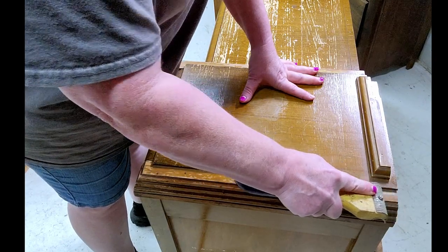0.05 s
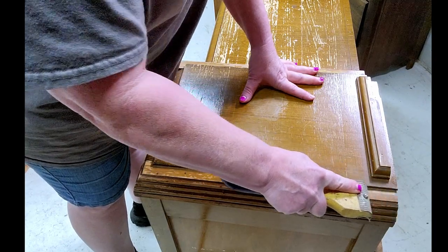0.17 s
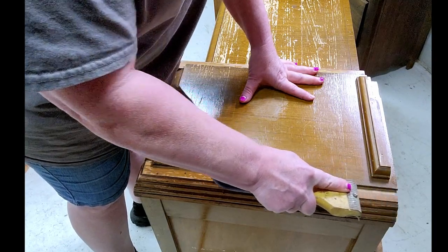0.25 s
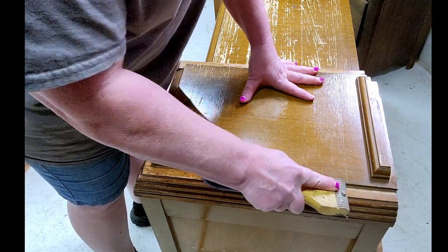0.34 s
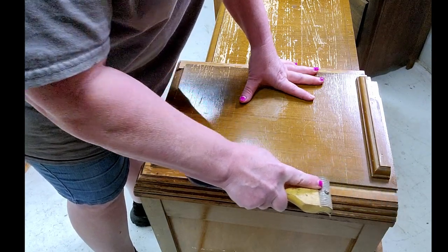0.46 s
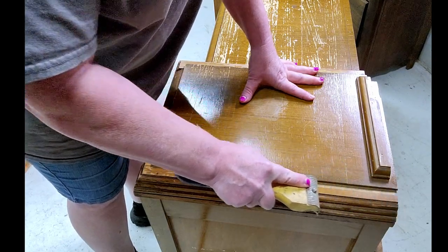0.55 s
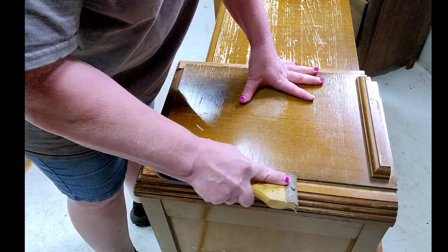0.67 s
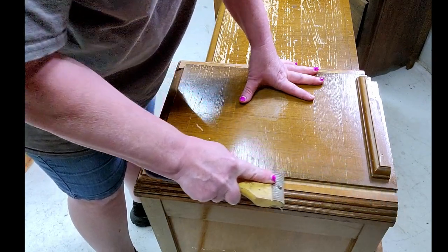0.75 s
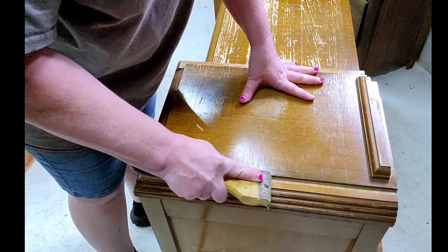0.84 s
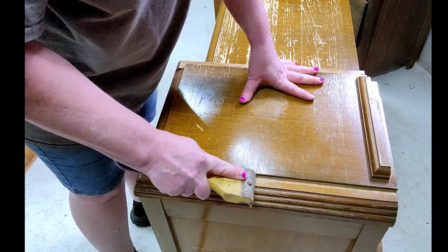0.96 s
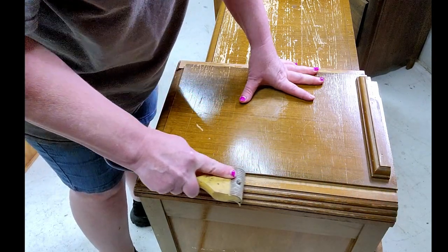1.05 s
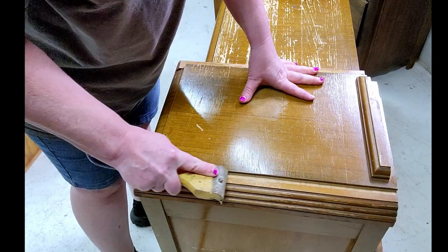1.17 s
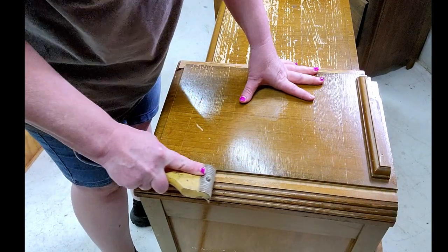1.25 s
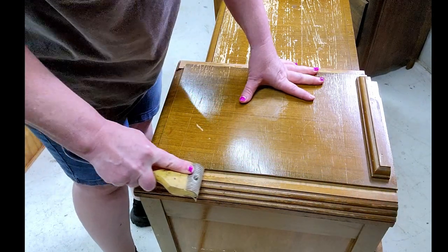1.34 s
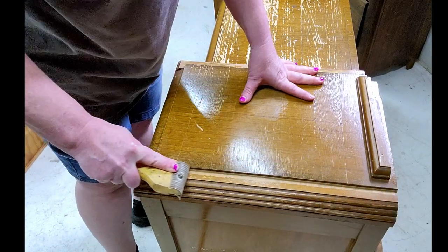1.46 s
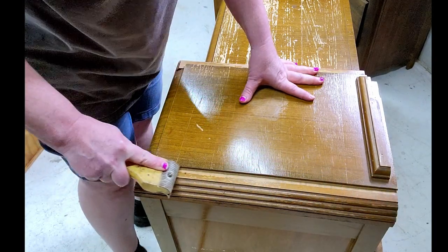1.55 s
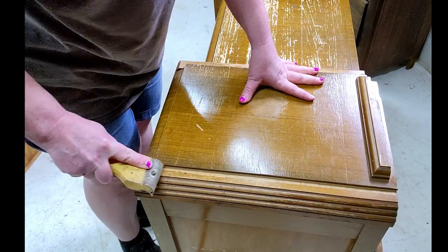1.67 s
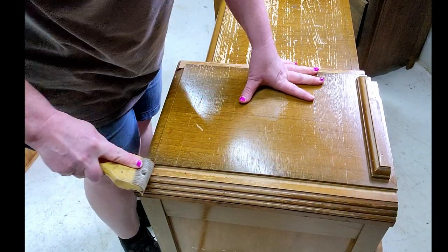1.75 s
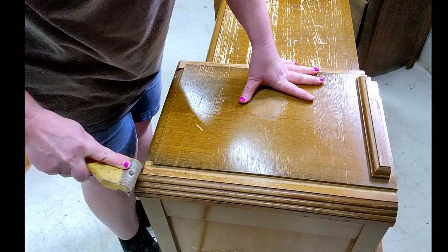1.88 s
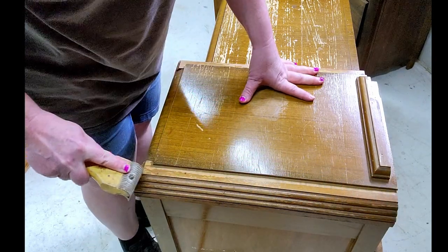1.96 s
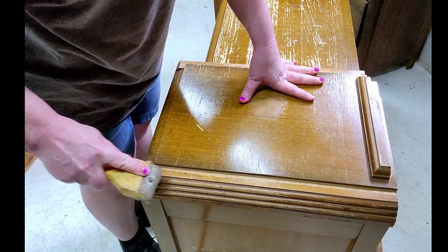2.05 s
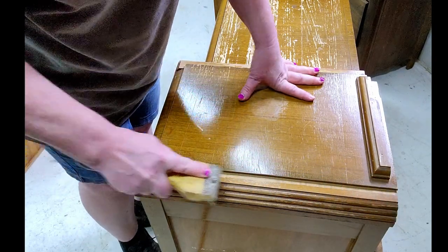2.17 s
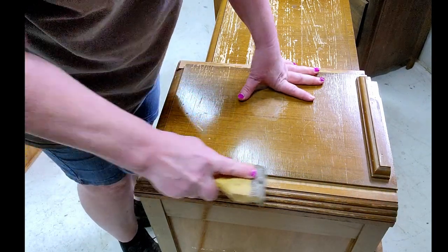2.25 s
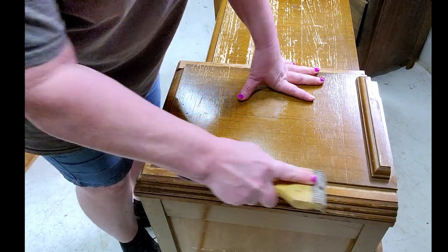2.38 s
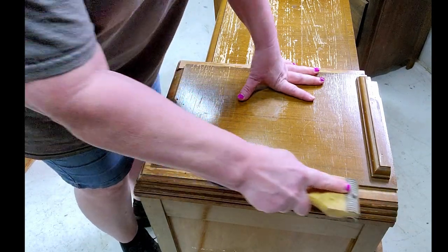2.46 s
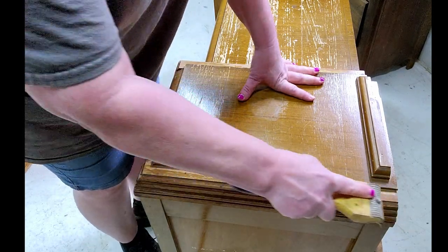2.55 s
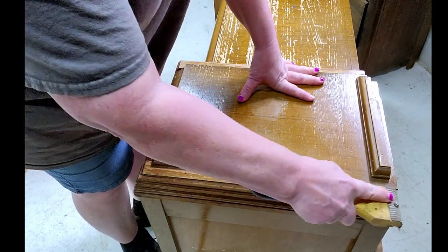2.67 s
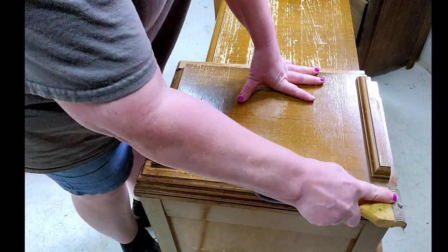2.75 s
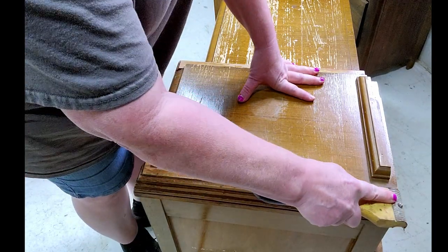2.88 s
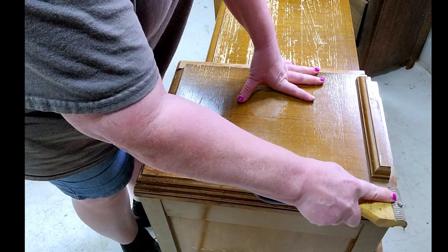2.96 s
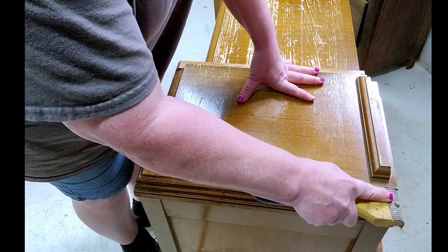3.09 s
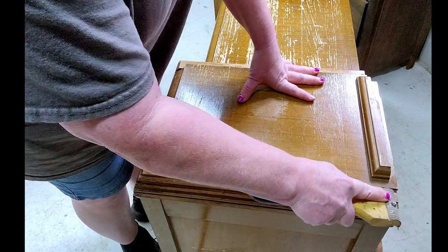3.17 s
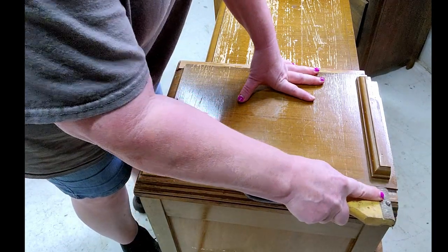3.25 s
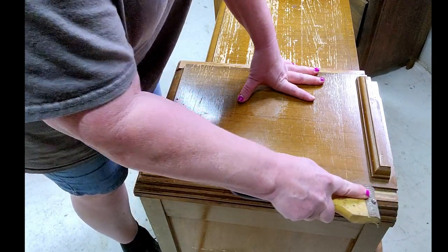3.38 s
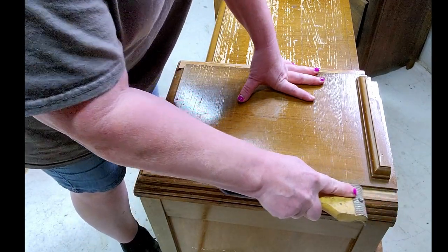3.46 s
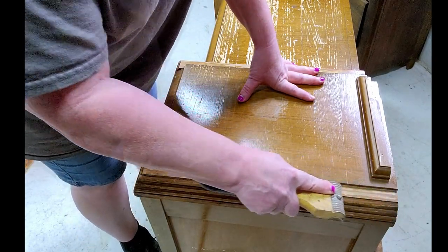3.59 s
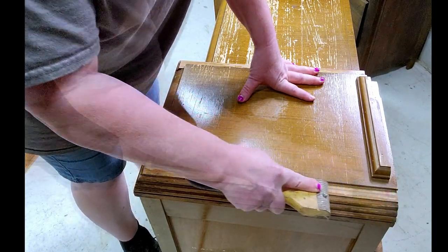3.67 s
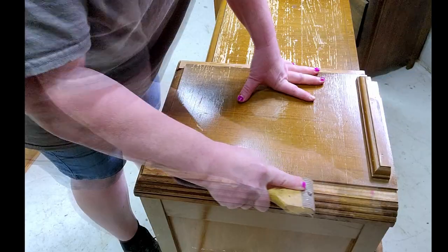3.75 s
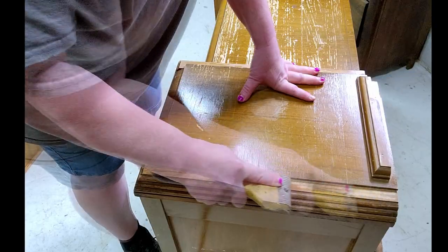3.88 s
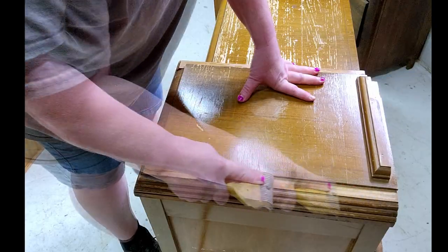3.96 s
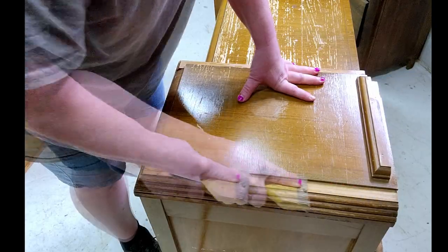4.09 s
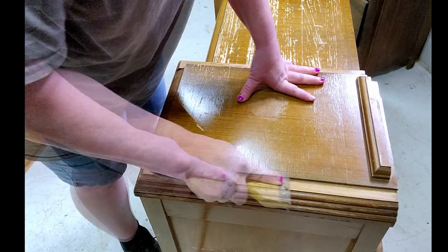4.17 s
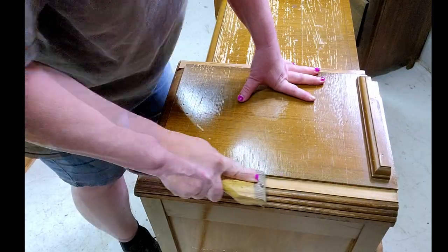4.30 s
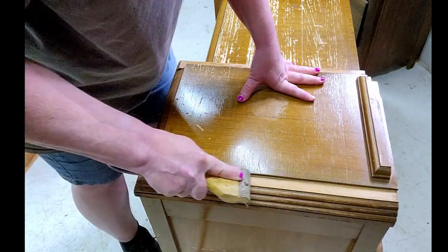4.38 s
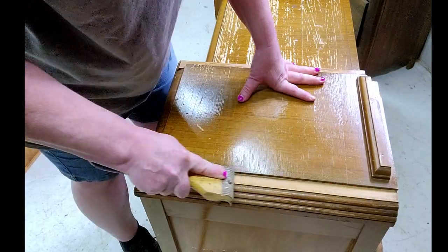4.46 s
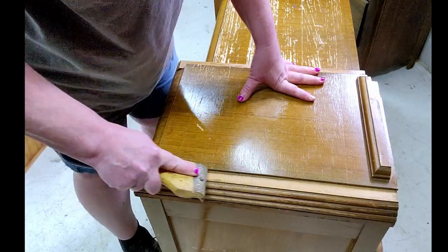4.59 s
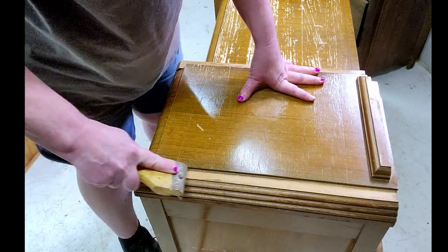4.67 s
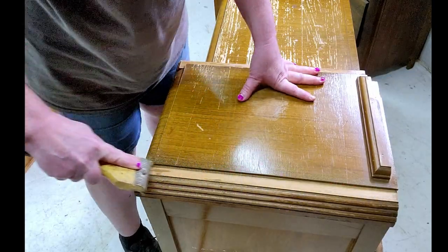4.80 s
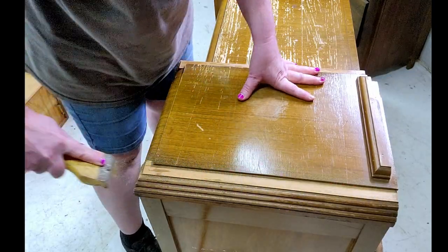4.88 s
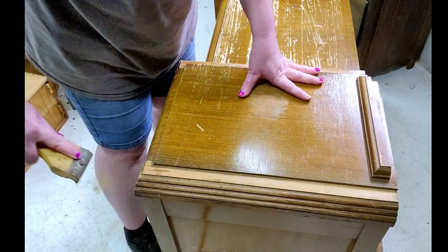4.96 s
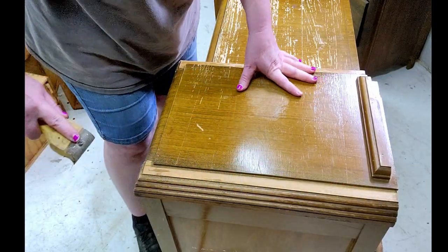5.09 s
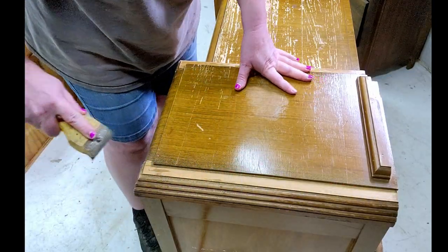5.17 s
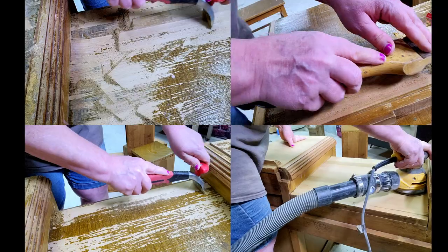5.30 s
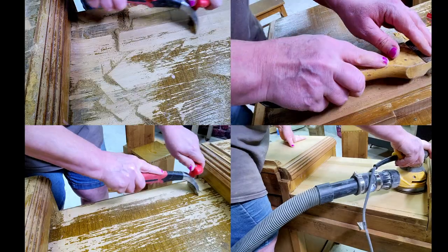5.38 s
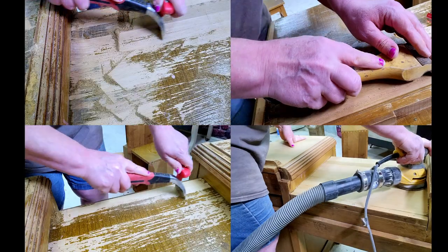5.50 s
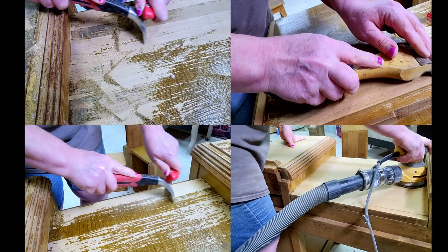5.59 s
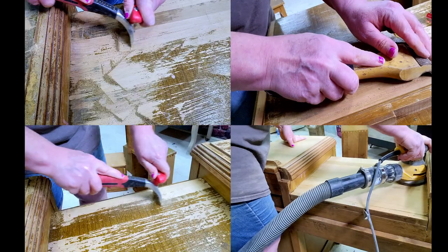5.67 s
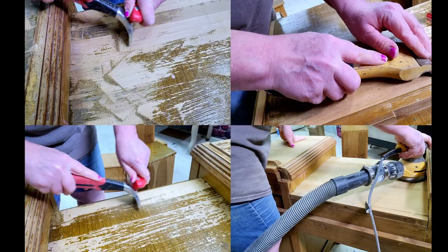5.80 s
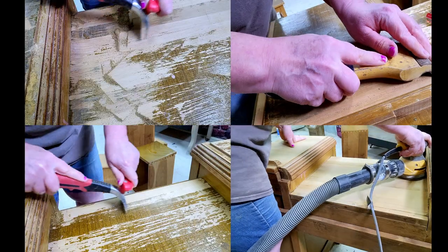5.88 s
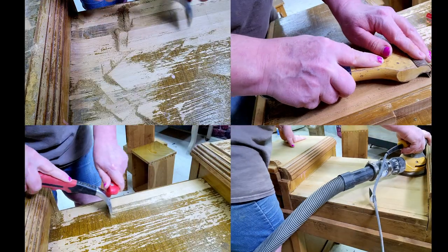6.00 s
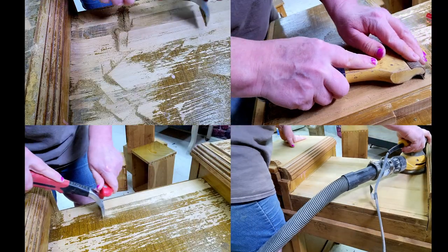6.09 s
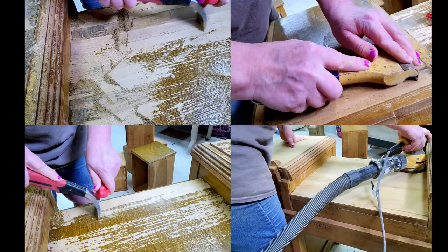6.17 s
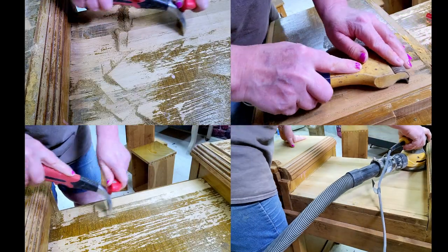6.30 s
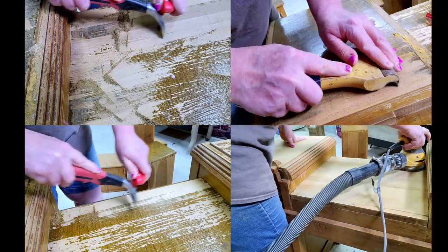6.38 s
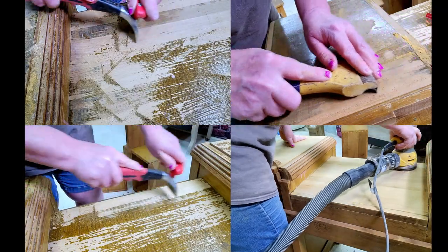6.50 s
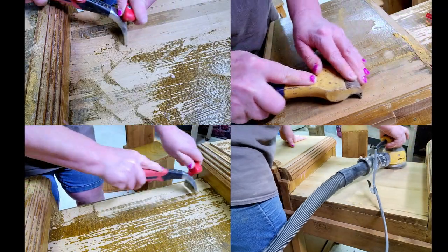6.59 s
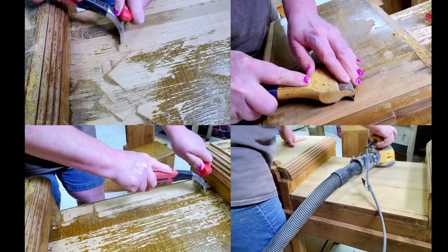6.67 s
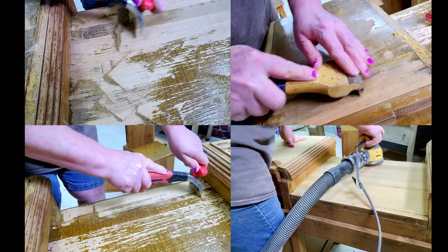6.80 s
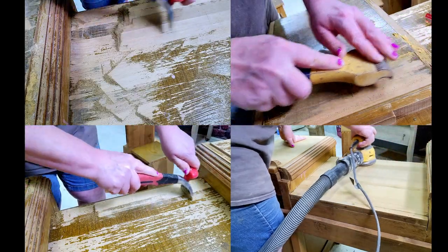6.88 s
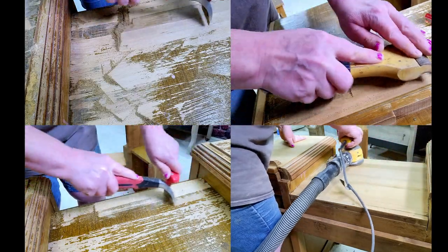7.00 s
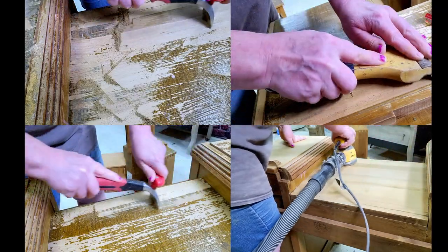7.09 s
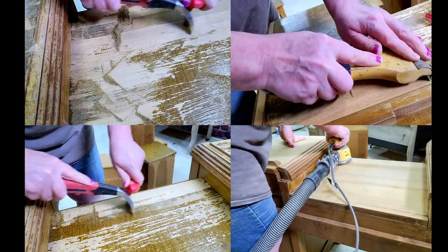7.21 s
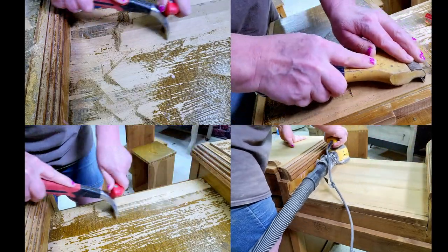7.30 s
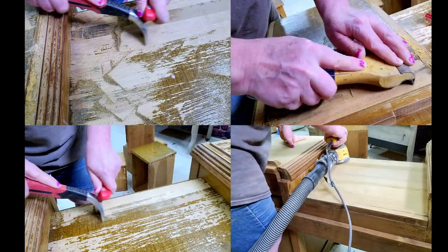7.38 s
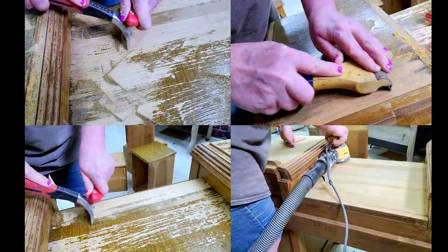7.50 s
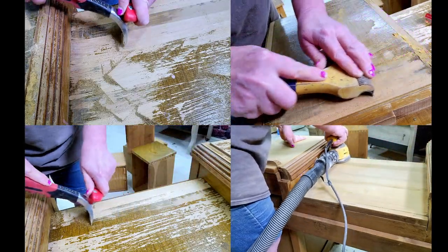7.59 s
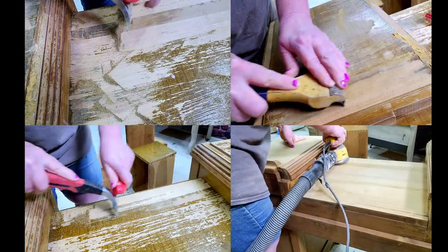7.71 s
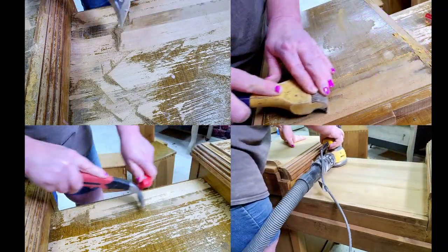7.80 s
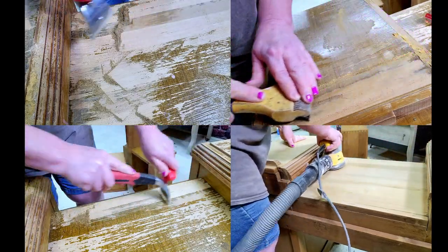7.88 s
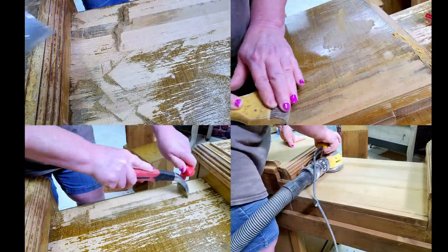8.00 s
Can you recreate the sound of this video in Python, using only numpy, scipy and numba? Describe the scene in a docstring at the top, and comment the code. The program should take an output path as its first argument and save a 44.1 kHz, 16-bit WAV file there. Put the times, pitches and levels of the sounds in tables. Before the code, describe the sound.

A close, dry scraper works old varnish in a small workshop with low, restless room air. The sound starts mid-stroke: a harsh, steady, gritty rasp with bright chatter and thin steel ring until about 1.85 s, ending in a small clack. A faint slide whispers to 2.6 s, with tiny knocks and ticks from 2.3 s and a clearer clack at 2.84 s. From about 3.1 s a second long pull swells quickly, rasps strongly, then stutters and lightens after 3.9 s, with juddering snags around 4.6-4.86 s before stopping near 5 s. A light brush leads to a firm, hollow double knock at 5.28 s. A coarser, woodier panel scrape runs roughly 5.5-6.25 s. After a pause, a boomy thud lands at 6.68 s, then another short rough scrape, 6.9-7.65 s, bites in spurts. Near-silence follows, with a dull knock at 8.0 s.

```python
"""Hand scraper on old furniture finish

Place: a small workshop. A scraper makes two long pulls along a moulded wooden edge, then two shorter ones
on a panel. Distance: close, the direct sound standing over a short, dull tail from the walls.
The blade sticks and slips hundreds of times a second; these pulses ring filtered wood and spray flake noise.
Snags, light slides, knocks of the tool and steel ticks are added over a low, restless room background.
At the microphone the sound has evenly spaced notches and its treble ends steeply."""
import sys
import numpy as np
from scipy import signal
from scipy.fft import rfft, irfft, next_fast_len
from scipy.io import wavfile
from scipy.ndimage import uniform_filter1d
from numba import njit

SR = 44100
rng = np.random.default_rng(int(sys.argv[2]) if len(sys.argv) > 2 else 0)


def wrap_up_sound(samples):
    """Save the sound to the file named by the first command line argument, as 16-bit audio."""
    columns = np.atleast_2d(samples).T
    # keep every value between -1 and 1, then stretch to whole-number steps
    tamed = np.clip(columns, -1, 1)
    steps = np.round(tamed * 32767).astype(np.int16)
    wavfile.write(sys.argv[1], SR, steps)


N = 355005
T = np.arange(N) / SR  # time, s
HZ = np.maximum(np.fft.rfftfreq(32768, 1 / SR), 1)  # frequency grid of the body filters, Hz

# pulls along the edge: touch_s, full_speed_s, ease_off_s, creep_db, fade_db_per_s, level_db
EDGE_PULLS = [(-0.1, 0.527, 1.827, -2, 155, -36), (3.06, 3.31, 4.9, -17.5, 146.5, -34.5)]
# pulls on the panel: touch_s, full_speed_s, ease_off_s, creep_db, fade_db_per_s, level_db
PANEL_PULLS = [(5.3, 5.54, 6.193, -1.5, 135, -36), (6.775, 6.96, 7.578, -2, 112, -36.5)]
# depth of the cut, one curve per pull; deep cuts rasp and flake, shallow ones only rub: time_s, bite_db
EDGE_BITE_CURVES = [
    [(0, 1), (.28, -0.5), (.45, 0.5), (.72, 0.5), (.87, -0.5), (1.2, -1.6), (1.7, 0), (1.82, -6.5),
     (1.9, -6.5)],
    [(3.09, 1.5), (3.14, -5), (3.23, -4), (3.4, -0.5), (3.85, -2.5), (3.93, -7.5), (4.22, -9), (4.4, -13),
     (4.68, -10.5), (4.76, -4), (4.85, -8.5), (4.98, -10)],
]
PANEL_BITE_CURVES = [
    [(5.32, -13.5), (5.46, -9.5), (5.53, -1.5), (5.7, -1), (5.87, 2.5), (6.0, 1), (6.1, -1), (6.28, -12.5)],
    [(6.84, -11), (6.96, -2.5), (7.07, 3.5), (7.2, 2.5), (7.3, 2.5), (7.44, 3), (7.52, -4), (7.68, -12.5)],
]
# how wood, rasp and flakes (one row each) follow the hand: db_per_db_of_speed, db_per_db_of_bite
EDGE_HAND_RESPONSE = [(1.0, 0.25), (1.1, 1.0553), (1.42, 2)]
PANEL_HAND_RESPONSE = [(1.0, 0.018), (1.1, 0.96), (1.65, .65)]
# short swells and dips of the scrape, with brighter or duller rasp:
# time_s, length_s, speed_change_db, bite_change_db
SCRAPE_JOLTS = [(1.657, 0.032, 4.5, -9), (3.877, 0.031, 6, -4), (3.954, 0.061, -8, 3),
                (4.014, 0.031, 3, 5.5), (4.095, 0.12, -6, 3.5), (4.157, 0.033, 0.5, 5.5),
                (4.208, 0.022, -5.5, 8.5), (4.64, 0.048, 4.5, -0.5), (4.74, 0.022, 3.5, 0),
                (4.794, 0.034, 1.5, 3.5), (4.869, 0.018, 4, 1), (6.957, 0.016, 1.5, 4),
                (7.499, 0.03, 1.5, 2.5)]
# broad colour of blade and wood together: pitch_hz, relative_level_db
EDGE_BODY_COLOUR = [(50, -33), (120, -5), (300, -6), (700, -5.5), (1050, -1.5), (1700, -5), (2650, -6),
                    (3600, -1.5), (4500, -7), (5800, -18.5), (7400, -32.5), (9300, -24.5), (11300, -28.5),
                    (13000, -37), (15500, -38)]
PANEL_BODY_COLOUR = [(50, -60), (140, 1), (320, -2), (760, -1.5), (1100, 6.5), (1350, 0), (1800, -5.5),
                     (2500, -11.5), (3500, -13.5), (5600, -20), (6600, -35), (7900, -28), (9600, -37.5),
                     (12500, -38.5), (13800, -36), (15500, -46)]
# resonances of the wood: pitch_hz, width_hz, lift_db
EDGE_WOOD_MODES = [(200, 21, 8), (333, 105, 8), (502, 25, 5), (644, 18, 6.5), (733, 54, 5),
                   (1120, 150, 6.5), (1390, 58, -4), (2040, 12, -5), (2081, 230, 9.5), (2310, 290, 1),
                   (2580, 34, -2.5), (2576, 250, 4.5), (2630, 88, 2.5), (3910, 123, -16)]
PANEL_WOOD_MODES = [(145.2, 8.3, 16.2), (358, 29, 3.4), (455, 9, 1.1), (522, 12, 7.3), (696, 71, 5.7),
                    (1100, 20, 1.6), (1316, 30, 5.7), (1500, 220, 3.7), (1770, 11.02, 1.6), (1910, 16, 1.6),
                    (2206, 260, 5.8), (2430, 150, 3.7), (2580, 15, 1.4)]
# broad resonance of the wood, shifting with the blade's place along the edge: time_s, pitch_hz
EDGE_RESONANCE_PATH = [(0, 398), (.6, 536), (1.1, 440), (1.6, 440), (3.15, 300), (3.3, 467), (3.45, 650),
                       (4.55, 650), (4.85, 388)]
# hollow rasp of the panel: time_s, pitch_hz
PANEL_RESONANCE_PATH = [(5.66, 1390), (5.86, 1160), (6.04, 1410), (6.9, 1370), (7.6, 1320)]
# the blade catches and chatters on one resonance of tool or wood (silent if the end precedes the start):
# start_s, end_s, first_hz, last_hz, lift_db
CHATTER_CATCHES = [(-0.45, 0.53, 4130, 4340, 8.5), (-0.2, 0.52, 1520, 1460, 7), (-0.7, 1.4, 830, 750, 2),
                   (0.2, 0.75, 3300, 3500, 4), (0, 1.02, 4550, 4300, 4), (-0.1, 0.95, 11150, 11250, 4.5),
                   (7, 6.96, 700, 700, 3), (0.8, 2.07, 205, 170, 5), (1.1, 2.2, 510, 510, 4.5),
                   (0.9, 1.486, 6000, 5340, 8), (0.85, 1.4, 2260, 2220, 5.5), (1.3, 1.93, 2650, 2350, 6),
                   (1.38, 1.797, 3460, 3500, 3.5), (3.5, 3.78, 3760, 3800, 6), (4, 4.04, 5400, 4800, 11),
                   (3.5, 4.238, 3800, 4360, 10), (4.67, 4.93, 2400, 2400, 8), (4.58, 5.02, 3470, 3700, 1),
                   (3, 3.6, 4730, 4660, 7), (4.5, 5.64, 8000, 6800, 8), (5.823, 5.943, 4100, 4200, 5),
                   (5, 5.964, 2530, 2470, 2.5), (6, 7.11, 7800, 6900, 14), (6.5, 7.34, 2600, 2900, 2.5),
                   (7, 7.44, 3350, 3500, 3.5), (6, 7.42, 4400, 4100, 2.5), (7.423, 7.53, 5900, 5400, 3)]
# the blade snags on a hard spot and judders: start_s, length_s, level_db, pitch_hz
HARD_SPOT_SNAGS = [(0.792, 0.0093, -37, 3400), (1.6, 0.022, -40.5, 2570), (1.682, 0.026, -36.5, 2570),
                   (4.617, .022, -42, 2470), (4.758, 0.011, -34, 2520), (4.78, .022, -33, 2510),
                   (4.858, 0.015, -34, 2440), (5.701, .008, -34, 1410), (7.053, .02, -35, 1450),
                   (7.104, .012, -33, 1410), (7.165, 0.019, -37.5, 1410), (7.283, .014, -38.5, 2620)]
# the tool knocks on the wood; boom and snap are relative to level_db:
# start_s, level_db, clack_hz, rattle_length_s, boom_db, snap_db
TOOL_KNOCKS = [(1.873, -39, 440, 0.054, -21, -19), (2.329, -59, 600, 0.022, -10, -13),
               (2.372, -61, 560, .02, -10, -11), (2.621, -60, 580, .025, -5, -18),
               (2.682, -61, 580, 0.021, -6, -15), (2.803, -58.5, 640, 0.022, -11, -17),
               (2.842, -40, 460, 0.032, -11.5, -21.5), (2.851, -46, 550, 0.03, -14, -26),
               (2.882, -50.5, 610, 0.02, -9, -24), (2.934, -53, 560, 0.03, -2, -21),
               (5.2775, -29.5, 633, 0.031, 5.5, -16), (5.297, -37, 600, 0.023, 3, -18),
               (5.313, -40, 750, 0.015, -7, -17), (6.677, -43.5, 370, 0.13, 15.5, -8.5),
               (6.695, -46, 384, 0.032, 7, -15), (6.778, -39, 700, 0.038, -4, -10),
               (6.796, -39.5, 695, 0.019, -2, -10), (7.208, -46, 327, 0.05, 7, -18),
               (8.016, -39.5, 407, 0.06, 5, -9.5)]
# boards' modes, struck by every knock: pitch_hz, relative_level_db, t60_s
STRUCK_BOARD_MODES = [(294, -2.5, 0.081), (408, -3.5, 0.18), (524.7, -3.5, 0.18), (614, -9.5, 0.22),
                      (691.2, -1, 0.15), (778, -6, 0.12), (870, -9.5, 0.13), (1110, 2, 0.076)]
# the cabinet's low modes: pitch_hz, relative_level_db, t60_s
CABINET_MODES = [(142, 15.5, 0.18), (165.4, 8.5, 0.18), (209.4, 8, 0.19)]
# the steel edge alone ticks against the finish: start_s, level_db
STEEL_TICKS = [(2.583, -54), (2.843, -68.5), (3.096, -58), (3.116, -70), (3.156, -64)]
# the blade slides, barely touching: start_s, end_s, level_db
LIGHT_SLIDES = [(2.084, 2.58, -72), (3.025, 3.24, -63), (5.028, 5.258, -57.5), (6.3, 6.506, -77),
                (7.72, 8.035, -71)]
# spectrum of the room air: pitch_hz, relative_level_db
AIR_COLOUR = [(25, -19), (55, 3), (90, 7.5), (140, 6), (300, -6.5), (600, -15), (1000, -13), (1300, -22),
              (2400, -31.5), (4000, -37.5), (6500, -43), (9000, -59), (15000, -68)]
# faint band of hiss in the air: pitch_hz, width_hz, lift_db
AIR_HISS_BAND = [(2340, 220, 6)]

RISE_S = 0.12  # time from creep to full speed
CLACK_OCTAVES = 1.13  # width of the clack
AIR_DB, ROOM_T60_S = -53, 0.29
TOP_HZ = 15700  # upper limit of the treble


def edge_scraping(wood_lift_db=5.0, wood_q=1.03, steel_hz=11170.0, steel_lift_db=6):
    """A narrow blade on hard varnish: quick, fine slips into wood whose resonance shifts along the edge."""
    force = friction(slips(rate=700, uneven=.75, scatter_db=1.5), grit_db=-2, grit_s=0.0029)
    rung = boards(force, ring_db=-2.0, t60=0.1, damp_hz=12600)
    sound = ring(rung, body(EDGE_BODY_COLOUR, EDGE_WOOD_MODES))
    wood_hz = np.interp(T, *np.transpose(EDGE_RESONANCE_PATH))
    wood = undb(wood_lift_db) * resonate(sound, wood_hz, wood_q)
    # the tip of the blade adds a thin, high ring
    steel_gain = undb(steel_lift_db + 2.5 * walk(50))
    steel = steel_gain * resonate(sound, np.full(N, steel_hz), 23.0)
    sound = sound + wood + steel + scratches(sound, centre_hz=3300, lift_db=-12.5)
    return strokes(EDGE_PULLS, EDGE_BITE_CURVES, room(sound, wet_db=-8.0), EDGE_HAND_RESPONSE,
                   rasp_db=0, flakes_db=-14.5, patchy_db=0.6, crackle_db=0.54, settle_s=0.054)


def panel_scraping(hollow_lift_db=-4, hollow_q=7.3):
    """A long-handled blade on a flat panel: coarser slips, scratches and a hollow rasp that comes in spurts."""
    force = friction(slips(rate=600, uneven=.75, scatter_db=0.0), grit_db=-3, grit_s=0.0028)
    rung = boards(force, ring_db=0.0, t60=0.091, damp_hz=11700)
    sound = ring(rung, body(PANEL_BODY_COLOUR, PANEL_WOOD_MODES))
    hollow_hz = np.interp(T, *np.transpose(PANEL_RESONANCE_PATH))
    hollow_gain = undb(hollow_lift_db + 2.3 * walk(90))
    sound = sound + hollow_gain * resonate(sound, hollow_hz, hollow_q)
    sound = sound + scratches(sound, centre_hz=4050, lift_db=-5.5)
    return strokes(PANEL_PULLS, PANEL_BITE_CURVES, room(sound, wet_db=-6.5), PANEL_HAND_RESPONSE,
                   rasp_db=3, flakes_db=-18.0, patchy_db=0.67, crackle_db=1.5, settle_s=0.007)


def strokes(pulls, bites, sound, response, rasp_db, flakes_db, patchy_db, crackle_db, settle_s):
    """Speed drives the wood, the bite of the blade the rasp, and brittle patches of finish the flakes."""
    wood, rasp, flakes = registers(sound)
    patches = patchy_db * walk(100)
    crackle = .5 * patches + crackle_db * walk(110)
    wood = unit(steady(wood) * undb(patchy_db * walk(45)))
    rasp = undb(rasp_db) * unit(steady(rasp) * undb(patches))
    flakes = undb(flakes_db) * unit(steady(flakes) * undb(crackle))
    jolt_speed, jolt_bite = np.zeros(N), np.zeros(N)
    for time, length, speed_db, bite_db in SCRAPE_JOLTS:
        bump = np.exp(-2 * np.minimum(abs(T - time) / length, 10) ** 2)
        jolt_speed += speed_db * bump
        jolt_bite += bite_db * bump
    out = np.zeros(N)
    for (touch, full, ease, creep_db, fade_db_per_s, level_db), curve in zip(pulls, bites):
        # the hand creeps, speeds up, holds and eases off
        speed = np.interp(T, [full - RISE_S, full], [creep_db, 0])
        speed = speed - fade_db_per_s * np.maximum(T - ease, 0) + jolt_speed
        bite = np.interp(T, *np.transpose(curve)) + jolt_bite
        # the blade takes a moment to settle into the finish
        contact = undb(level_db) * np.clip((T - touch) / settle_s, 0, 1)
        for layer, (per_speed, per_bite) in zip((wood, rasp, flakes), response):
            out += contact * layer * undb(per_speed * speed + per_bite * bite)
    return out


def slips(rate, uneven, scatter_db):
    """Stick-slip pulses: the longer the blade sticks, the harder it lets go."""
    chance = np.clip(rng.standard_normal((40000, 2)), -2, 2)
    stick = np.exp(uneven * chance[:, 0] - uneven ** 2 / 2)
    at = (np.cumsum(stick) * SR / rate).astype(int)
    size = np.sqrt(stick) * undb(scatter_db * chance[:, 1])
    pulses = np.bincount(at[at < N], size[at < N], N)
    return unit(pulses - pulses.mean())


def friction(pulses, grit_db, grit_s):
    """Each slip is followed by a short spray of breaking varnish."""
    decay = np.exp(-T[:SR // 20] / grit_s)
    spray = np.maximum(ring(pulses - pulses.min(), decay), 0)
    return pulses + undb(grit_db) * unit(spray * rng.standard_normal(N))


def boards(x, ring_db, t60, damp_hz, travel_rate=7):
    """Waves crisscross the boards; the travelling blade feeds a changing mix of their dense upper modes."""
    t = T[:SR // 4]
    places = np.array([walk(travel_rate) for _ in range(5)])
    places /= np.sqrt(np.sum(places ** 2, axis=0))  # constant total power
    out = x.copy()
    for share in places:
        tail = rng.standard_normal(len(t)) * np.exp(-np.log(1000) * t / t60)
        tail = band(tail / np.linalg.norm(tail), 454, damp_hz, order=1)
        out += undb(ring_db) * ring(x * share, tail)
    return out


def scratches(x, centre_hz, lift_db):
    """Grains of finish pass under the blade: brief bright bursts at a wandering pitch."""
    hz = np.clip(centre_hz * 2 ** (.5 * walk(30)), 1000, 12000)
    bursts = undb(lift_db + 5 * np.clip(walk(140), -2, 2))
    return bursts * resonate(x, hz, 5.0)


def catches(x, q=9.5, flutter_db=2.5, wobble=0.0049):
    """At each catch one resonance swells out of the scrape, flutters and dies away."""
    out = x.copy()
    flutter = undb(flutter_db * walk(70))
    drift = 1 + wobble * walk(33)
    for start, end, first_hz, last_hz, lift_db in CHATTER_CATCHES:
        span = (T > start) & (T < end)
        progress = (T[span] - start) / (end - start)
        hz = (first_hz + (last_hz - first_hz) * progress) * drift[span]
        swell = np.sqrt(np.sin(np.pi * progress)) * flutter[span]
        out[span] += (undb(lift_db) - 1) * swell * resonate(x[span], hz, q)
    return out


def snags(q=6.5, upper_ratio=1.34, upper_db=-4, attack_s=0.0034, release_s=0.004):
    """A short run of hard slips rings two resonances of the tool, then the blade breaks free."""
    force = friction(slips(rate=520, uneven=.5, scatter_db=2.0), grit_db=-4, grit_s=0.00072)
    out = np.zeros(N)
    for start, length, level_db, hz in HARD_SPOT_SNAGS:
        span = (T > start) & (T < start + length + 10 * release_s)
        t = T[span] - start
        lower_hz = np.full(len(t), float(hz))
        upper_hz = lower_hz * upper_ratio
        # each resonance is applied twice, for steeper sides
        lower = resonate(resonate(force[span], lower_hz, q), lower_hz, q)
        upper = resonate(resonate(force[span], upper_hz, q), upper_hz, q)
        grip = np.minimum(t / attack_s, 1) * np.exp(-np.maximum(t - length, 0) / release_s)
        out[span] += undb(level_db) * grip * unit(lower + undb(upper_db) * upper)
    return room(out, wet_db=-10.5)


def knocks(rattle_db=-2.5, board_db=-3, rattle_tail_db=-15, tail_t60_s=0.53, swell_s=0.0012):
    """The tool lands with a snap, rings the boards and rattles on them while the cabinet booms underneath."""
    out, t = np.zeros(2 * N), T[:SR // 2]
    attack = slice(SR // 40)  # each part is levelled over its first 25 ms
    # cabinet and boards take a moment to get going; the cabinet radiates no deep bass
    swell = 1 - np.exp(-t / swell_s)
    boom = band(struck(CABINET_MODES, t) * swell, 134, 900, order=3)
    board = struck(STRUCK_BOARD_MODES, t) * swell
    spread = 2 ** (CLACK_OCTAVES / 2)
    for start_s, level_db, hz, length, boom_db, snap_db in TOOL_KNOCKS:
        # a longer rattle leaves more ringing in the boards
        tail_gain = undb(rattle_tail_db) * min(length / 0.13, 1) ** 2
        fade = np.exp(-2 * t / length) + tail_gain * np.exp(-np.log(1000) * t / tail_t60_s)
        force = fade * rng.standard_normal(len(t))
        force[0] += 4.5  # the first hard contact
        rattle = band(force, hz / spread, hz * spread, order=3)
        clack = band(board, hz / spread, hz * spread, order=3)
        snap = band(band(force, 1050, 1440, order=1), 420, 3300, order=2)
        parts = (rattle, rattle_db), (clack, board_db), (snap, snap_db), (boom, boom_db)
        knock = sum(undb(part_db) * x / x[attack].std() for x, part_db in parts)
        start = int(start_s * SR)
        out[start:start + len(t)] += undb(level_db) * knock
    return room(out[:N], wet_db=-4)


def struck(modes, t):
    """Free ringing of a table of modes after one blow."""
    return sum(undb(db - 60 * t / t60) * np.sin(2 * np.pi * hz * t) for hz, db, t60 in modes)


def ticks(lo_hz=850, hi_hz=4600, decay_s=0.0011):
    """Short, dry contacts of the steel: noise bursts with two broad rings, near 1.5 and 3.4 kHz."""
    out, t = np.zeros(N), T[:SR // 40]
    for start_s, level_db in STEEL_TICKS:
        contact = band(np.exp(-t / decay_s) * rng.standard_normal(len(t)), lo_hz, hi_hz, order=7)
        upper_ring = band(contact, 3000, 3900, order=1)
        lower_ring = undb(-1) * band(contact, 1250, 1750, order=1)
        start = int(start_s * SR)
        out[start:start + len(t)] += undb(level_db) * unit(contact + upper_ring + lower_ring)
    return room(out, wet_db=-18)


def slides(bright_hz=2700, ease_s=0.098, lift_off_s=0.032):
    """Unloaded, the blade only whispers over the finish: band-passed noise with a wavering level."""
    hiss = unit(band(rng.standard_normal(N), 840, bright_hz, order=2)) * undb(2 * walk(60))
    level = np.zeros(N)
    for start, end, level_db in LIGHT_SLIDES:
        fade_in = np.clip((T - start) / ease_s, 0, 1)
        fade_out = np.clip((end - T) / lift_off_s, 0, 1)
        level += undb(level_db) * fade_in * fade_out
    return hiss * level


def air():
    """Low, slightly restless background of the workshop: coloured noise."""
    noise = unit(ring(rng.standard_normal(N), body(AIR_COLOUR, AIR_HISS_BAND)))
    return undb(AIR_DB + 1.5 * walk(8.1)) * noise


def room(x, wet_db, damp_hz=3500):
    """Direct sound plus a short, duller tail from the walls."""
    t = T[:SR // 2]
    tail = rng.standard_normal(len(t)) * undb(-60 * t / ROOM_T60_S)
    tail *= np.clip(t / 0.022, 0, 1) ** 2  # the reflections build up
    low_pass = signal.butter(1, damp_hz, fs=SR, output="sos")
    tail = signal.sosfilt(low_pass, tail / np.linalg.norm(tail))
    return x + undb(wet_db) * ring(x, tail)


def body(colour, modes=()):
    """Causal (minimum-phase) impulse response of a broad colour with resonances standing out of it."""
    hz, db = np.transpose(colour)
    db = np.interp(np.log(HZ), np.log(hz), db)
    for centre, width, lift in modes:
        db = db + lift / (1 + (2 * (HZ - centre) / width) ** 2)
    # folding the cepstrum onto positive times makes the response causal
    cepstrum = irfft(np.log(undb(db)))
    cepstrum[1:len(HZ) - 1] *= 2
    cepstrum[len(HZ):] = 0
    return irfft(np.exp(rfft(cepstrum)))[:len(HZ)]


@njit
def resonate(x, hz, q):
    """State-variable band-pass whose centre moves; gain 1 at the centre."""
    y, b, l = np.empty(len(x)), 0., 0.  # output, band-pass state, low-pass state
    for i in range(len(x)):
        g = np.tan(np.pi * hz[i] / SR)
        v = (b + g * (x[i] - l)) / (1 + g * (g + 1 / q))
        b, l, y[i] = 2 * v - b, l + 2 * g * v, v / q
    return y


def registers(x, wood_hz=1000, flake_hz=6050):
    """Split into low, middle and high parts that add up to the whole."""
    size = next_fast_len(N + SR // 10, real=True)
    hz, spectrum = np.fft.rfftfreq(size, 1 / SR), rfft(x, size)
    low = irfft(spectrum / (1 + (hz / wood_hz) ** 12), size)[:N]
    below_top = irfft(spectrum / (1 + (hz / flake_hz) ** 12), size)[:N]
    return low, below_top - low, x - below_top


def steady(x, span_s=0.12):
    """Even out slow swells, so that the hand sets the slow course of the level."""
    return x / np.sqrt(uniform_filter1d(x ** 2, size=int(span_s * SR) + 1) + 1e-18)


def walk(rate):
    """Smooth random drift with spread near 1; rate in new values per second."""
    k = int(SR / rate)
    steps = np.repeat(rng.standard_normal(N // k + 1), k)
    return unit(uniform_filter1d(steps, k))[:N]


def band(x, lo_hz, hi_hz, order=4):
    """Causal band-pass."""
    hi_hz = np.clip(hi_hz, lo_hz + 20, SR / 2 - 10)
    return signal.sosfilt(signal.butter(order, [lo_hz, hi_hz], "band", fs=SR, output="sos"), x)


def ring(x, response):
    """Pass a sound through an impulse response."""
    return signal.oaconvolve(x, response)[:len(x)]


def unit(x):
    """Scale to rms 1."""
    return x / np.sqrt(np.mean(x ** 2))


def undb(db):
    """Decibels to gain."""
    return 10 ** (np.asarray(db) / 20)


def scene():
    """Scraping with its snags, light slides, knocks and ticks over the room's background."""
    scraping = catches(edge_scraping() + panel_scraping())
    return (scraping + snags() + knocks() + ticks() + slides() + air())[None]


def record(dry):
    """A copy about a millisecond late, subtracted, cuts evenly spaced notches that fade in the high treble."""
    size = next_fast_len(N + SR // 10, real=True)
    hz = np.fft.rfftfreq(size, 1 / SR)
    share = np.interp(hz, [0, 3000, 7200, 10200, 12500], [.7, .92, .88, .65, .1])
    late = share * np.exp(-2j * np.pi * hz / 1017.5)  # notches 1017.5 Hz apart
    comb = .82 * (1 - late) / (1 - .27 * late)  # part of the late copy recirculates
    sound = irfft(rfft(dry, size) * comb, size)[:, :N]
    # the treble ends steeply
    return signal.sosfilt(signal.ellip(10, .2, 70, TOP_HZ, fs=SR, output="sos"), sound)


dry = scene()
out = record(dry)
wrap_up_sound(out)
```